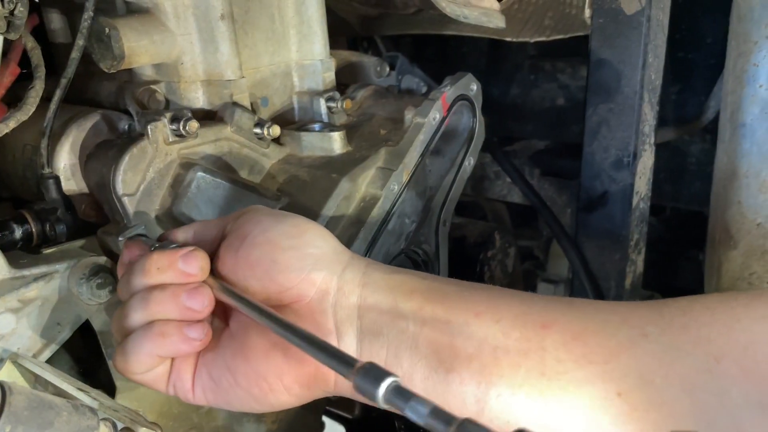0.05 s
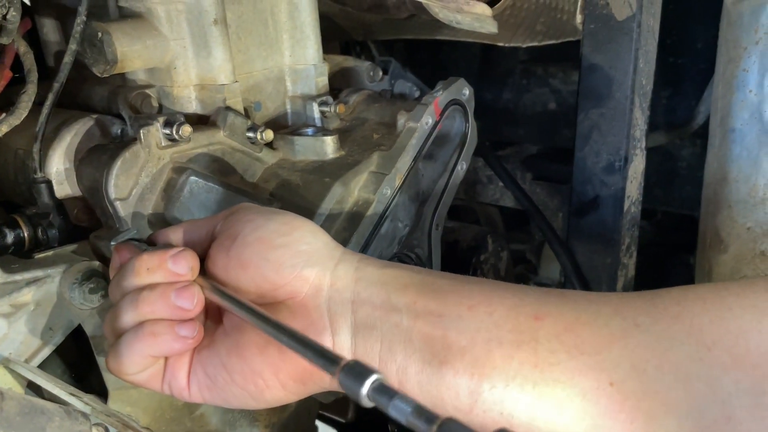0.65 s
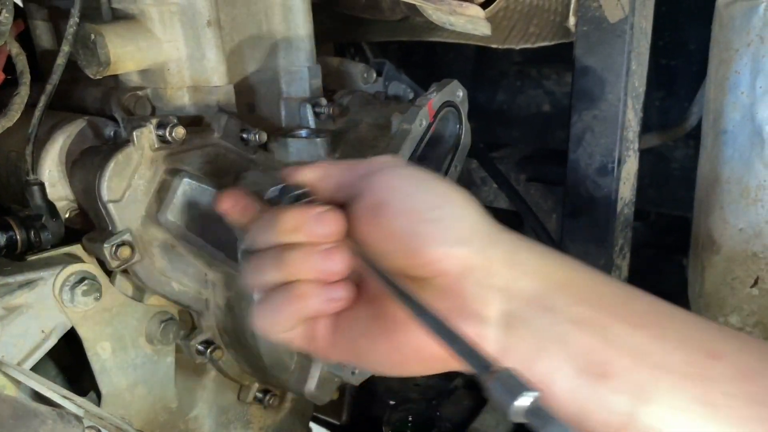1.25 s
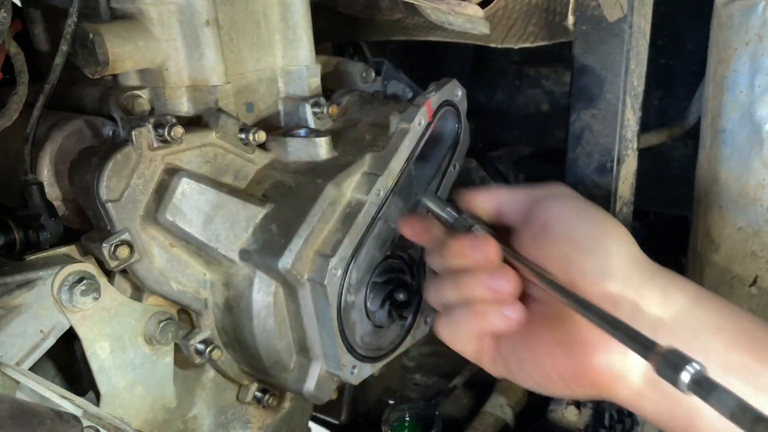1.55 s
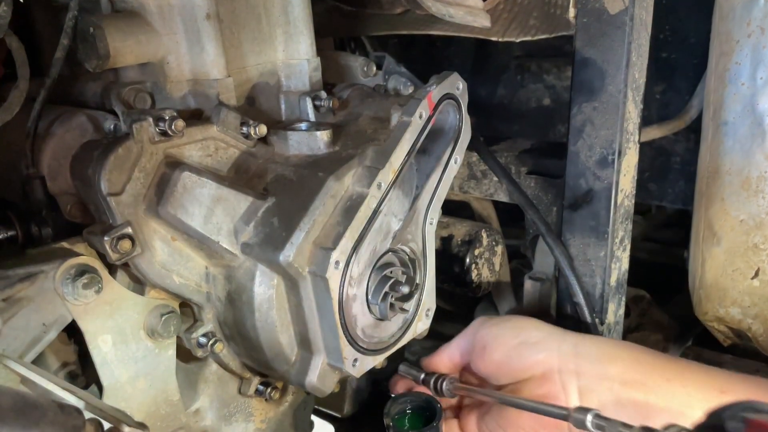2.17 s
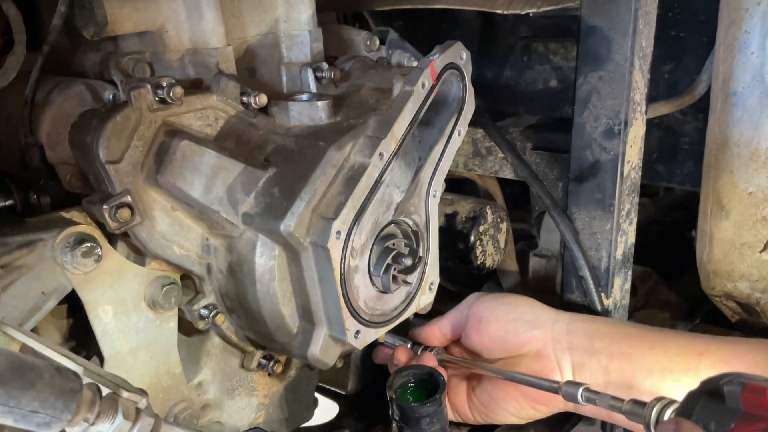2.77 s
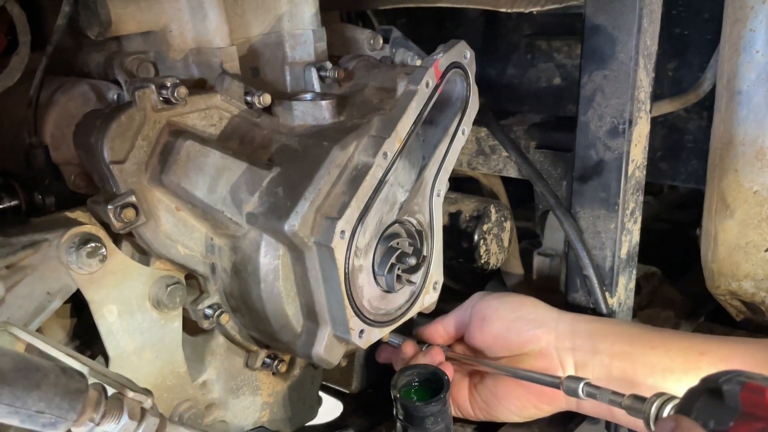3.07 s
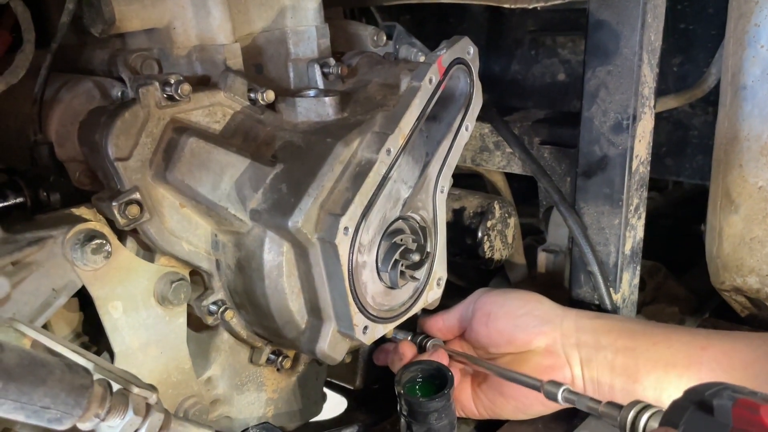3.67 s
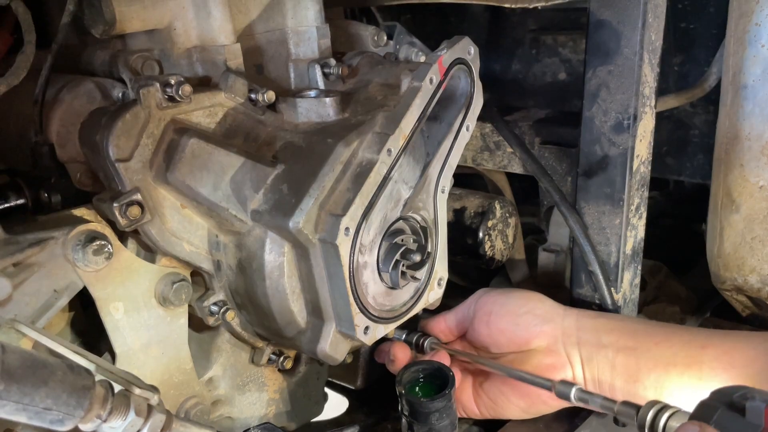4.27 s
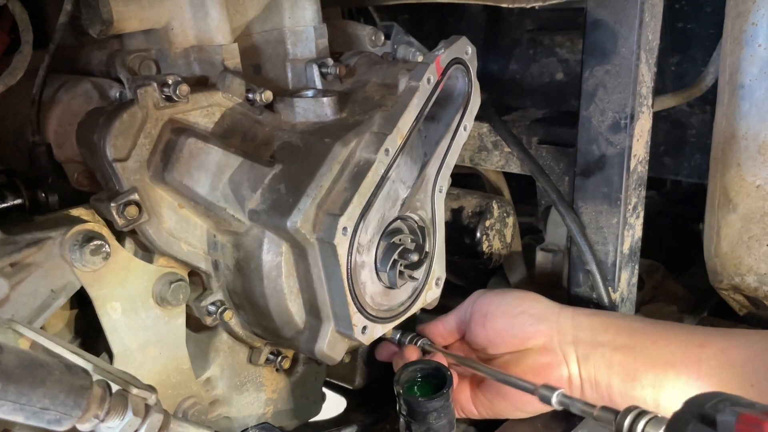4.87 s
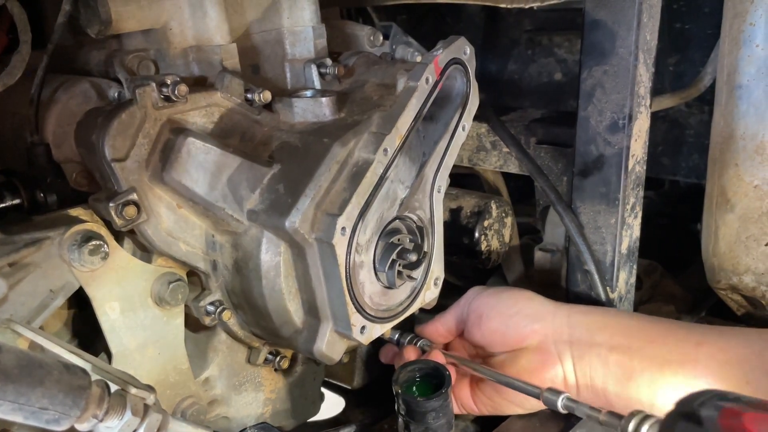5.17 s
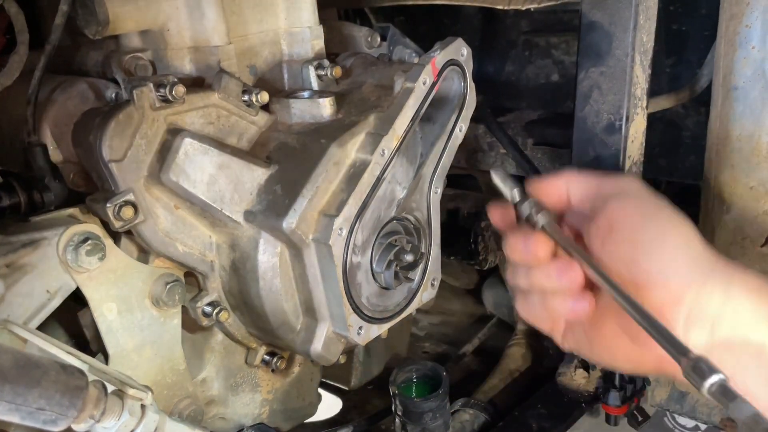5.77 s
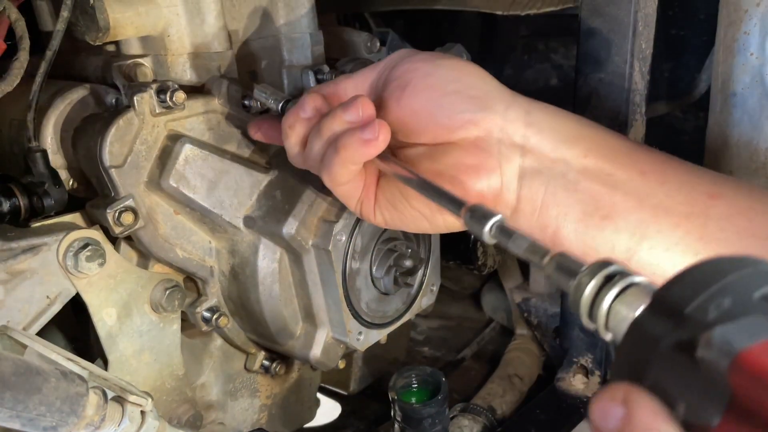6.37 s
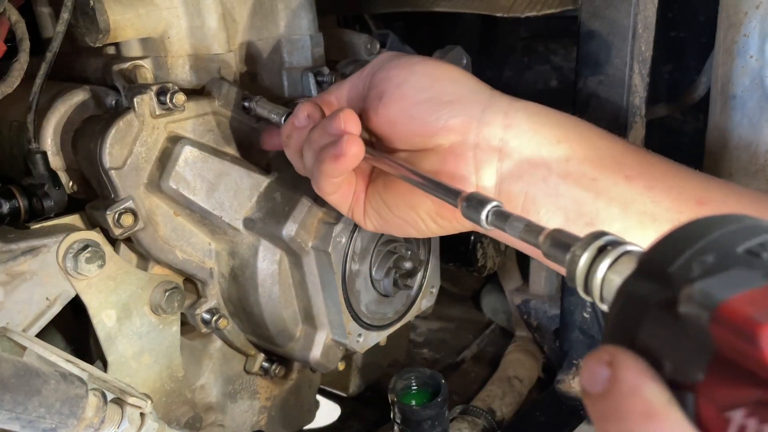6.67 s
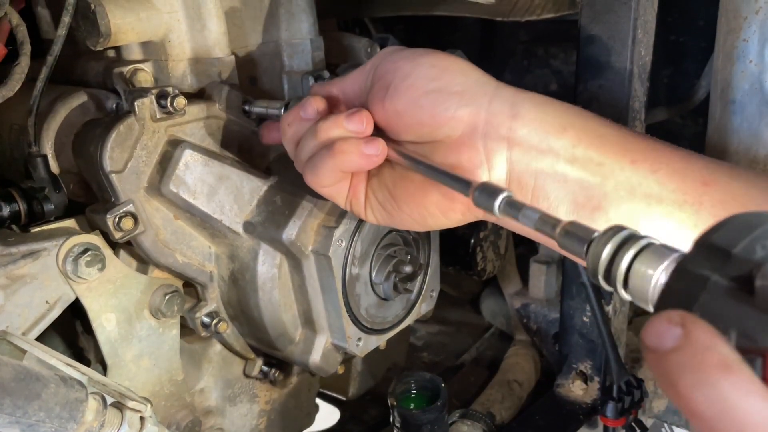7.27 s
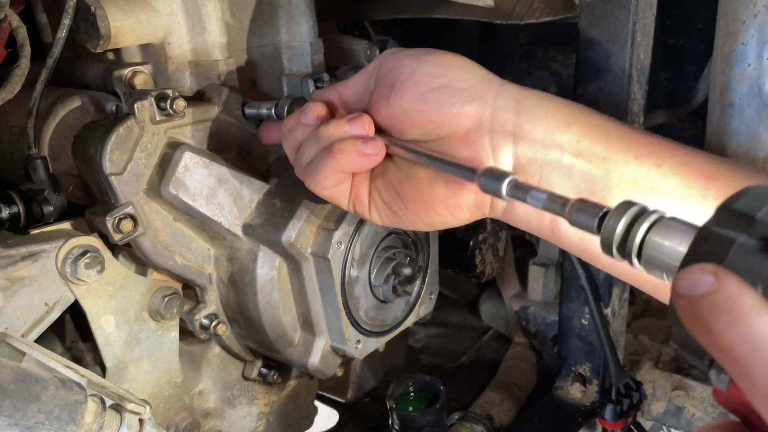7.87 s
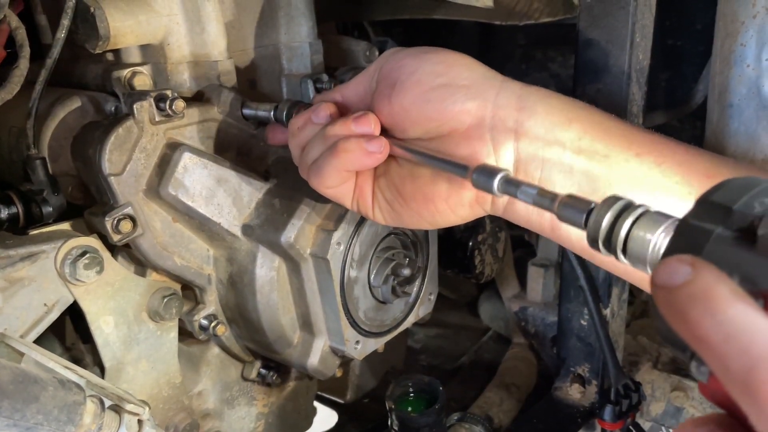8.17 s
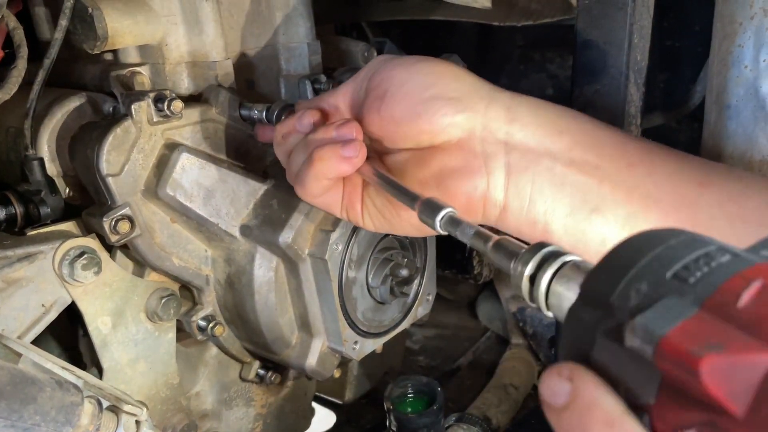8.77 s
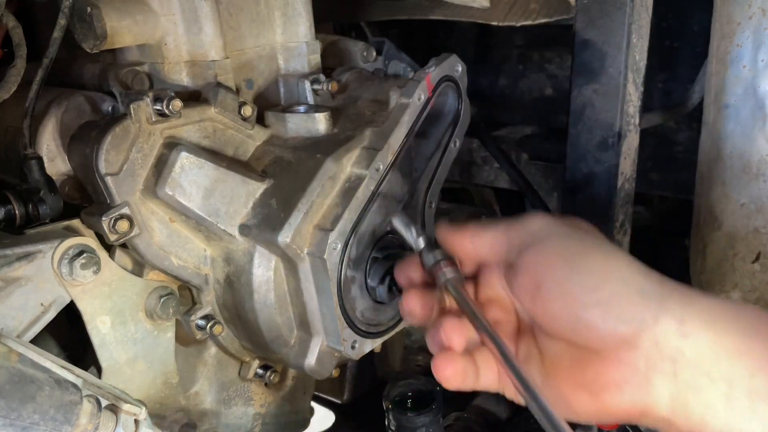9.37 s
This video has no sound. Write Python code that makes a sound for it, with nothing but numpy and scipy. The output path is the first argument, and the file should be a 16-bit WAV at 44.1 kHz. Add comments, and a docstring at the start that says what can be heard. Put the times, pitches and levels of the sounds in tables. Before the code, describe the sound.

A cordless drill is heard very close, tightening bolts on a metal engine cover over faint workshop air and a low machine hum. It starts at once on a nearly tight bolt: the gears grind and the clutch slips in two bursts of hard snaps, finishing by 0.9 seconds. A quiet pause holds soft hand rubbing and small socket ticks. At 3.3 seconds the socket clinks onto the second bolt and the motor whines with rattling gears, until the bolt binds and the clutch clicks loudly from 4.7 to 5 seconds. The socket ticks as it comes off around 5.4 seconds. After another lull, clinks lead into a third run at 7.2 seconds, the whine rising slightly, then ending in sharp snaps and dull thuds from 8.4 to 8.7 seconds. A brief low rumble and two light clinks follow by about 9.3 seconds.

```python
"""A cordless drill runs three bolts into an aluminium engine cover, close up, over workshop air and hum.
It starts on a nearly tight bolt: the gears grind and the torque clutch slips in hard snaps, twice over.
The socket clinks onto the second bolt; from 3.3 s the motor whines and the gears rattle freely,
until the bolt binds and the clutch snaps again. The socket ticks as it is wiggled off.
The third bolt runs in from 7.2 s and seats with snaps and thuds; a low rumble and two clinks follow."""
import sys
import numpy as np
from scipy import signal
from scipy.fft import rfft, irfft, next_fast_len
from scipy.io import wavfile

SR = 44100
rng = np.random.default_rng(int(sys.argv[2]) if len(sys.argv) > 2 else 0)


def wav_record(signal):
    """Record a signal, one row per channel, as 16-bit PCM in the file named by sys.argv[1]."""
    frames = np.transpose(np.atleast_2d(signal))
    bounded = np.clip(frames, -1, 1)
    # unit amplitude maps onto the largest positive 16-bit level
    quanta = np.round(bounded * 32767).astype(np.int16)
    wavfile.write(sys.argv[1], SR, quanta)


N = 424683
TIME = np.arange(N) / SR


def undb(db):
    """Decibels to gain."""
    return np.exp(np.log(10) / 20 * np.asarray(db))

def unit(x):
    """Scale to rms 1."""
    return x / np.sqrt(np.mean(x ** 2))

def sine(cycles):
    """Sine of a phase counted in cycles."""
    return np.sin(2 * np.pi * cycles)

def noise(size=N):
    """White noise."""
    return rng.standard_normal(size)

def curve(rows):
    """One automation curve for each column after the time."""
    s, *columns = np.transpose(rows)
    return [np.interp(TIME, s, c) for c in columns]

def walk(rate):
    """Random modulation: rate points a second, joined by straight lines; rms 1."""
    count = int(N * rate / SR) + 2
    return unit(np.interp(TIME * rate, np.arange(count), noise(count)))

def swell(s, half_s, db):
    """A smooth fade in and out around a moment."""
    return undb(db) * np.exp(-((TIME - s) / half_s) ** 2)

def add(track, s, sound):
    """Mix a short sound in at a time."""
    i = max(int(s * SR), 0)
    track[i:i + len(sound)] += sound[:N - i]

def response(points, size):
    """Spread (frequency, value) points over the bins of an FFT."""
    hz, value = np.transpose(points)
    return np.interp(np.log(np.arange(size // 2 + 1) * SR / size + 1), np.log(hz), value)

def ring(x, impulse):
    """Play a sound through an impulse response."""
    return signal.oaconvolve(x, impulse)[:len(x)]

def colour(x, points, size=4096):
    """Minimum-phase EQ that keeps the power of white noise."""
    cepstrum = irfft(np.log(undb(response(points, size))))
    cepstrum[1:size // 2] *= 2
    cepstrum[size // 2 + 1:] = 0
    impulse = irfft(np.exp(rfft(cepstrum)))
    return ring(x, impulse / np.linalg.norm(impulse))

def modes(rows):
    """Impulse response of a set of decaying resonances; energy 1."""
    t = TIME[:SR]
    impulse = sum(undb(db - 60 * t / t60) * sine(hz * t) for hz, db, t60 in rows)
    return impulse / np.linalg.norm(impulse)

def tail(t60):
    """Dense decaying reflections; energy 1."""
    impulse = noise(SR) * undb(-60 * TIME[:SR] / t60)
    return impulse / np.linalg.norm(impulse)

def burst(contact_ms, buzz_db, buzz_t60, rise_ms=0.58, size=4096):
    """Steel chatters on steel for a few ms and the parts around it buzz on; energy 1."""
    ms = 1000 * TIME[:size]
    contact = np.exp(-(ms / contact_ms) ** 2)
    buzz = undb(buzz_db - 60 * TIME[:size] / buzz_t60)
    force = noise(size) * (1 - np.exp(-ms / rise_ms)) * (contact + buzz)
    return force / np.linalg.norm(force)


# Stereo image at the two microphone ports:
# (frequency [Hz], left minus right [dB], left phase lead [rad], weight of reflections [ratio])
STEREO_IMAGE = [(100, 0, 0, 0.063), (696, -2, 0.91, .25), (1460, -1.5, -1.5, 0.44), (2380, 1.5, 0.2, 0.37),
                (2900, 5.5, 1.2, 0.39), (4300, 1.5, 0.33, .35), (5640, 3, 1.5, 0.41),
                (6380, .5, 0.04, 0.38), (8760, -0.5, -4, 0.028), (9550, 0.5, -4.5, .2),
                (11300, -1, -7, .05), (13400, 0.5, -7.5, .2), (14800, 1.5, -9.5, .05)]

def place(x, pan_db, scatter, scatter_t60=0.17):
    """Each port hears the direct sound with its own phase, plus its own reflections; +pan is left."""
    size = 2 * next_fast_len((N + SR) // 2, True)
    ports = np.array(STEREO_IMAGE)
    balance_db, lead, weight = (response(ports[:, [0, k]], size) for k in (1, 2, 3))
    wet = np.clip(scatter * weight, 0, 1)
    spectrum, out = rfft(x, size), []
    for side in (1, -1):
        direct = np.sqrt(1 - wet) * np.exp(.5j * side * lead)
        reflected = np.sqrt(wet) * rfft(tail(scatter_t60), size)
        gain = undb(side * (balance_db + pan_db) / 2)
        out.append(irfft(spectrum * (direct + reflected) * gain, size)[:N])
    return np.array(out)


# Room tone EQ: (frequency [Hz], level [dB])
AIR_EQ = [(20, -41), (40, -19.5), (62, -9), (100, -12.5), (140, -12), (200, -18.5), (400, -19.5),
          (800, -23), (1500, -27), (4000, -36), (8000, -50.5), (12000, -55), (15000, -60.5)]
# Room tone fader: (time [s], level [dB])
AIR_FADER = [(0, -43.5), (.5, -57), (1.2, -62), (1.6, -59), (5, -56.5), (9.6, -57)]
# Hum of a distant machine: (frequency [Hz], level over the air [dB])
HUM_TONES = [(131.8, 2.5), (128, -11), (173, -14)]

def room_tone():
    """The bed: dark workshop air, and a machine hum that wavers in level and pitch."""
    air_db, = curve(AIR_FADER)
    air = colour(noise(), AIR_EQ) * undb(air_db + 0.32 * walk(8))
    hum = 0
    for hz, db in HUM_TONES:
        gain = np.sqrt(2) * undb(air_db + db + walk(10))
        hum += gain * sine(np.cumsum(hz * (1 + 0.0043 * walk(9))) / SR)
    return air, hum


# The hand slides along the extension bar: (centre time [s], half length [s], level [dB])
HAND_SLIDES = [(1.56, 0.19, -64), (5.402, 0.11, -61.5), (5.627, 0.054, -64.5), (6.018, 0.091, -65),
               (8.966, 0.18, -59.5), (9.28, 0.057, -70)]

def handling(grip_db=-80.5):
    """The hand rubs softly; the gripped drill and the cover rumble after the last bolt seats."""
    rub_eq = [(300, -4), (1500, 8), (4500, 2.5), (8000, -9), (12000, -6.5), (15000, -14.5)]
    rumble_eq = [(22, -17.5), (44, -2), (80, -16), (400, -25.5), (2000, -70.5)]
    sliding = undb(grip_db) + sum(swell(*slide) for slide in HAND_SLIDES)
    rub = colour(noise() * undb(3.2 * walk(280)), rub_eq) * sliding
    rumble = colour(noise(), rumble_eq) * swell(s=8.84, half_s=0.16, db=-49)
    return rub, rumble


# Lingering tones of the casting: (time [s], frequency [Hz], level [dB], t60 [s])
CASTING_TONES = [(0.633, 764, -64.5, 4), (0.633, 1723, -76.5, 3.5), (4.96, 830, -56.5, 1.1),
                 (8.703, 1980, -58.5, .8)]

def casting_ring():
    """The casting sings on faintly once a bolt is tight."""
    out, t = np.zeros(N), TIME[:3 * SR]
    for s, hz, db, t60 in CASTING_TONES:
        add(out, s, undb(db - 60 * t / t60) * sine(hz * t))
    return out


# Jolts through the engine mounts: (time [s], relative level [dB])
JOLTS = [(0.165, -28), (0.245, -27), (4.795, -35.5), (7.685, -35.5), (8.472, -21.5), (8.535, -21),
         (8.702, -19)]

def thumps(sweep_hz=330, end_hz=48, fall_s=0.0054, attack_s=0.0065, trim_db=-2.5):
    """Each jolt is heard as a short low thud that glides downward."""
    out, t = np.zeros(N), TIME[:SR // 4]
    phase = np.cumsum(end_hz + sweep_hz * np.exp(-t / fall_s)) / SR
    envelope = t / attack_s * np.exp(1 - t / attack_s)
    for s, db in JOLTS:
        add(out, s, undb(db + trim_db) * envelope * sine(phase))
    return out


# Clinks of socket, bolt and trigger: (time [s], relative level [dB], body over the clink [dB])
CLINK_HITS = [(0.5494, -34.5, 2), (0.581, -35, 13), (1.497, -44, -7), (2.554, -41.5, -9), (3.057, -53, 7.5),
              (3.102, -41, 4.5), (3.273, -44, -15.5), (3.331, -39, 0), (3.3445, -16, -7.5),
              (5.387, -18.5, -27), (5.8, -48, -7), (7.182, -45, 4), (7.243, -28.5, -30), (7.268, -26, -7),
              (8.966, -32, 1.5), (9.3221, -29.5, -6.5)]
# The socket is wiggled off a bolt: (centre time [s], half length [s], relative level [dB])
SOCKET_WIGGLES = [(5.353, 0.03, -47.5), (5.44, 0.046, -50), (9.027, 0.056, -46.5)]
# EQs of a bright clink and of the dull body of a hit on the gearbox: (frequency [Hz], level [dB])
CLINK_EQ = [(300, -24), (1000, -10), (2000, -4.5), (3300, 1.5), (6500, 0.5), (9000, -5), (13000, -7.5),
            (15500, -12.5)]
BODY_EQ = [(30, -27.5), (90, -8.5), (200, -8.5), (350, -12.5), (750, -4), (1050, -7.5), (1450, 0.5),
           (1750, -2), (2300, -6.5), (3500, -9), (6500, -21), (12000, -27.5), (15000, -26.5)]
# Ring of the loose socket: (frequency [Hz], level [dB], t60 [s])
SOCKET_MODES = [(2280, -11, 0.16), (2957, -6, 0.13), (3400, -1.5, 0.056), (4093, -1, .09),
                (5240, -4.5, 0.057), (6300, -7, .1)]
DULL_BUZZ = dict(buzz_db=-12, buzz_t60=0.09)

def socket_clinks(contact_ms=1.8, gain_db=10.5, ring_db=-10, ticks_per_wiggle=9):
    """Light metal taps and loose ticks; returns the hits and the socket's ring."""
    bright, body = np.zeros((2, N))
    for s, db, body_db in CLINK_HITS:
        add(bright, s, undb(db + gain_db) * burst(contact_ms, buzz_db=-10, buzz_t60=0.043))
        add(body, s, undb(db + gain_db + body_db) * burst(contact_ms, **DULL_BUZZ))
    for s, half_s, db in SOCKET_WIGGLES:
        for moment, strength in rng.uniform(-1, 1, (ticks_per_wiggle, 2)):
            tick = undb(db + gain_db + 9 * strength) * burst(contact_ms, **DULL_BUZZ)
            add(bright, s + half_s * moment, tick)
    hits = colour(bright, CLINK_EQ) + colour(body, BODY_EQ)
    return hits, undb(ring_db) * ring(bright, modes(SOCKET_MODES))


# Resonances of the drill's housing: (frequency [Hz], width [Hz], boost [dB], change under load [dB])
HOUSING_PEAKS = [(640, 40, 5, -4), (1310, 70, 6, -6), (1680, 220, 1.5, 3), (3080, 340, 4.5, 3),
                 (4650, 220, 4, 3)]

def housing_boost(hz, pressed, hop=64):
    """Boost in dB of a tone as it glides through the housing's resonances."""
    boost_db = sum((db + load_db * pressed[::hop]) * np.exp(-((hz[::hop] - centre) / width) ** 2)
                   for centre, width, db, load_db in HOUSING_PEAKS)
    return np.repeat(boost_db, hop)[:N]


# Magnetic and fan tones: (multiple of the turn rate, level [dB], change under load [dB])
MOTOR_PARTIALS = [(4, -22, -0.5), (6, -14.5, 0), (10, -10.5, 1.5), (12, -15.5, 5.5), (14, -0.5, -7),
                  (16, -4.5, -1.5), (18, -21, 11), (20, -17.5, 8), (22, -12, 9), (24, -22, 13),
                  (26, -16, 12), (30, -23.5, 15.5)]
# Fader on the whine's main tone: (time [s], level [dB])
MAIN_TONE_FADER = [(0.02, 1.5), (0.04, -6.5), (3.38, 2), (3.54, 3), (3.63, 0), (4.22, 1), (4.38, -5.5),
                   (4.52, -6.5), (4.6, 0), (4.64, -5.5), (7.29, 5), (7.33, -7), (7.45, 1), (7.6, -1.5),
                   (7.76, 1.5), (7.84, -11), (7.91, -7), (7.955, -15), (8.0, -3), (8.15, 0), (8.3, -2.5),
                   (8.36, -0.5)]
# Sidebands of the speed controller's chopping rate: (offset [turn rates], level [dB])
CHOPPER_SIDEBANDS = [(-4, -16.5), (-2, -10), (2, -13.5), (4, -25)]

def motor_whine(hz, turns, pressed, main_multiple=14, chopper_hz=8000, rough_db=1.7):
    """Harmonics ride the shaft speed, while the windings sing around the chopping rate."""
    main_db, = curve(MAIN_TONE_FADER)
    whine = 0
    for multiple, db, load_db in MOTOR_PARTIALS:
        boost_db = housing_boost(multiple * hz, pressed) + load_db * pressed
        if multiple == main_multiple:
            boost_db += main_db
        whine += undb(db + boost_db + rough_db * walk(70)) * sine(multiple * turns)
    for offset, db in CHOPPER_SIDEBANDS:
        whine += undb(db + 2 * walk(32)) * sine(chopper_hz * TIME + offset * turns)
    return whine


# Tones of the meshing gears: (multiple of the tooth rate, level [dB])
MESH_PARTIALS = [(1, -11.5), (2, -7), (3, -8), (4, -9), (5, -10.5), (6, -9), (7, -6.5), (8, -9.5), (9, -16)]
# EQs of the gear rattle and of the grind under load: (frequency [Hz], level [dB])
RATTLE_EQ = [(150, -19), (480, -20.5), (750, -6.5), (1100, -11), (1450, -3.5), (2300, -7), (3000, -2.5),
             (3700, -3), (4700, -2), (6800, -9.5), (7800, -17), (9500, -14), (13300, -17.5), (15000, -29)]
GRIND_EQ = [(30, -32.5), (100, -13), (400, -15.5), (750, -6.5), (1050, -6.5), (1500, -3), (2100, -5.5),
            (3000, -11.5), (6000, -33)]
# Resonances of the gear case: (frequency [Hz], level [dB], t60 [s])
GEAR_CASE_MODES = [(697, -11, 0.057), (860, -9.5, 0.094), (1370, -2, 0.029), (1523, 3.5, 0.049),
                   (1744, 3, 0.069), (2010, -2, 0.031), (4200, -3, 0.017)]

def gearbox(hz, turns, thread, pressed, rattle_gain, grind_gain, teeth_per_turn=22 / 7):
    """Loosely meshing teeth sing, rattle and growl, and grind under load."""
    # the off-centre planet carrier cyclically hurries the teeth and presses them harder
    wobble, planet = sine(turns / 9.7), sine(turns / 5.9)
    # backlash lets the teeth run ahead of and behind the shaft, less so under load
    backlash = 0.016 * (1 - 0.4 * pressed) * walk(400)
    teeth = teeth_per_turn * (turns + np.cumsum(hz * (backlash + 0.014 * wobble)) / SR)
    # the mesh brightens while the teeth are pressed together
    bite_db = 0.5977 * (wobble + 0.55 * planet + 0.65 * walk(110))
    mesh = 0
    for multiple, db in MESH_PARTIALS:
        boost_db = housing_boost(multiple * teeth_per_turn * hz, pressed) + multiple * bite_db
        mesh += undb(db + boost_db + 1.5 * walk(260)) * sine(multiple * teeth)
    pressure = undb(1.23 * wobble + 0.6 * planet + 0.48 * thread + 0.28 * walk(90))
    mesh *= pressure * (rattle_gain * undb(-7) + grind_gain * undb(-9))
    scrape = (1 + 0.52 * np.cos(2 * np.pi * teeth)) * pressure
    rattle = colour(noise() * scrape, RATTLE_EQ) * rattle_gain * undb(-3)
    grind = colour(noise() * scrape * undb(2.4 * walk(300)), GRIND_EQ) * grind_gain * undb(-2.5)
    # each tooth strikes its front or back flank, unevenly, and makes the case growl
    tooth_clicks = np.diff(np.floor(teeth), prepend=0)
    strikes = tooth_clicks * np.sign(noise()) * undb(3.7 * noise()) * pressure
    growl = unit(ring(strikes, modes(GEAR_CASE_MODES)))
    growl *= rattle_gain * undb(-11.5) + grind_gain * undb(-8)
    return rattle + grind + growl + mesh


# Motor speed from trigger pull to release, one list a run: (time [s], turn rate [Hz])
RUN_SPEEDS = [
    [(0.0, 217), (0.03, 212.1), (0.07, 195.9), (0.1, 178.3), (0.135, 151.1), (0.162, 133.2), (0.22, 149.9),
     (0.39, 172.3)],
    [(0.605, 193.8), (0.68, 195.2), (0.8, 176.3)],
    [(3.345, 203.2), (3.55, 204.3), (4.2, 208.5), (4.26, 212.8), (4.55, 216.7), (4.605, 208.5),
     (4.671, 182.3), (4.8, 191.2), (4.99, 182.7)],
    [(7.246, 178), (7.31, 211.3), (7.552, 214.7), (7.764, 222.6), (7.88, 227.3), (8.146, 230.8),
     (8.338, 227.5), (8.37, 209), (8.42, 199.4), (8.735, 175.5)],
]
# Load on each run: (bolt binds [s], clutch lets go [s], free rattle [dB], full-load grind [dB],
# whine over rattle [dB])
RUN_LOADS = [(0.047, 0.179, -26, -24.5, 0.5), (0.604, 0.639, -31, -32.5, 2.5),
             (4.601, 4.66, -38.5, -31, -5.5), (8.314, 8.416, -35.5, -29.5, -3.5)]
FREE_GRIND_DB = -13.5  # grind relative to rattle while spinning free

def run_envelopes(edge_s=0.0067, unload_s=0.029, spin_up_s=0.021):
    """Gains of rattle, grind and whine: a run spins free, loads up, and eases as the clutch slips."""
    gains = 0
    slipping_db = np.array([[-40], [-38], [-51]])  # rattle, grind, whine
    for speed, (bind_s, slip_s, free_db, loaded_db, whine_over_db) in zip(RUN_SPEEDS, RUN_LOADS):
        pull_s, release_s = speed[0][0], speed[-1][0]
        trigger = np.clip(np.minimum(TIME - pull_s, release_s - TIME) / edge_s + 1, 0, 1)
        load = np.sin(np.pi / 2 * np.clip((TIME - bind_s) / (slip_s - bind_s), 0, 1))
        eased = np.clip((TIME - slip_s) / unload_s, 0, 1)
        rattle_db = free_db + 4 * load
        grind_db = (1 - load) * (free_db + FREE_GRIND_DB) + load * loaded_db
        spin_up_db = -12 * np.exp(-np.abs(TIME - pull_s) / spin_up_s)
        whine_db = rattle_db + whine_over_db + spin_up_db - 4.5 * load ** 2  # sinks into the grind
        driving_db = np.array([rattle_db, grind_db, whine_db])
        gains += trigger * undb((1 - eased) * driving_db + eased * slipping_db)
    return gains

def drill(turns_per_bolt_turn=19.4, swell_db=0.6):
    """One shaft drives whine and gears; the thread drags on it and it judders under strain."""
    hz, = curve([row for run in RUN_SPEEDS for row in run])
    rattle_gain, grind_gain, whine_gain = run_envelopes()
    strain = np.minimum(grind_gain / (rattle_gain + 1e-9), 2)
    pressed = np.clip(strain - undb(FREE_GRIND_DB), 0, 1)
    thread = sine(np.cumsum(hz) / SR / turns_per_bolt_turn)
    drag = 0.008 * thread + 0.002 * walk(18)
    judder = 0.002 * walk(60) + 0.005 * strain * walk(300)
    turns = np.cumsum(hz * (1 + drag + judder)) / SR
    whine = motor_whine(hz, turns, pressed)
    gears = gearbox(hz, turns, thread, pressed, rattle_gain, grind_gain)
    return whine_gain * undb(swell_db * walk(8)) * whine, gears


# The clutch ratchets as the second run coasts to a stop: (time [s], relative level [dB])
RATCHET_CLICKS = [(0.8067, -5), (0.8216, -10.5), (0.836, -9), (0.8496, -10.5), (0.863, -12.5), (0.878, -14),
                  (0.896, -23)]
# EQ of the clutch's clicks and snaps: (frequency [Hz], level [dB])
SNAP_EQ = [(150, -26.5), (430, -16.5), (700, -10), (1100, -10.5), (1500, -2), (2100, -2), (2700, -2),
           (3400, 0), (4500, 0.5), (5500, 0), (7000, -1), (8300, -2), (10000, -4.5), (13000, -6.5),
           (15500, -10)]
CLUTCH_GAIN_DB = 16

def clutch_ratchet(contact_ms=2.1, ring_db=-10, held_decay=0.081):
    """The unloaded clutch makes short contacts; returns the clicks and the socket's choked ring."""
    clicks = np.zeros(N)
    for s, db in RATCHET_CLICKS:
        click = burst(contact_ms, buzz_db=-15, buzz_t60=0.066, rise_ms=0.35)
        add(clicks, s, undb(db + CLUTCH_GAIN_DB) * click)
    # pressed on a tight bolt, the socket rings for only a share of its time
    held_socket = modes([(hz, db, t60 * held_decay) for hz, db, t60 in SOCKET_MODES])
    return colour(clicks, SNAP_EQ), undb(ring_db) * ring(clicks, held_socket)


# The clutch jumps one ramp:
# (time [s], relative snap level [dB], body over the snap [dB], relative knock level [dB])
CLUTCH_SLIPS = [(0.165, -10.5, 5.5, -16), (0.1922, -6.5, -5.5, -10.5), (0.25, -6, -4.5, -6),
                (0.3049, -5.5, -10.5, -9), (0.3609, -6, -6.5, -19.5), (0.633, -4, -3.5, -2),
                (0.6886, -4, -3.5, -12.5), (0.7454, -4, -7, -19), (4.6749, -3, -7, -11.5),
                (4.735, -4.5, -10, -9), (4.791, -2.5, -11.5, -18), (4.8463, -6, -10.5, -23),
                (4.9025, -7.5, -4, -20), (4.9597, -5, -9.5, -18.5), (8.4143, -4.5, -6, -8.5),
                (8.4734, -4, -6, -12), (8.532, -5.5, -1.5, -18), (8.5878, -6, -3.5, -23),
                (8.6452, -6, -11.5, -14), (8.7018, -6, -6.5, -19.5)]

def clutch_snaps(snap_ms=6.3, rebound_ms=1.8, body_ms=6.1, rebound_s=0.0102):
    """Each slip is a hard snap and one softer rebound, both with a dull push into the gearbox."""
    crack, body = np.zeros((2, N))
    contacts = []
    for s, db, body_db, _ in CLUTCH_SLIPS:
        contacts += [(s, db, body_db, snap_ms), (s + rebound_s, db - 4.5, -8, rebound_ms)]
    for s, db, body_db, contact_ms in contacts:
        gain = undb(db + CLUTCH_GAIN_DB)
        add(crack, s, gain * burst(contact_ms, buzz_db=-16, buzz_t60=0.078))
        add(body, s, gain * undb(body_db) * burst(body_ms, rise_ms=3.9, **DULL_BUZZ))
    return colour(crack, SNAP_EQ) + colour(body, BODY_EQ)


# A bolt head beds in, or the gears knock under load: (time [s], relative level [dB])
KNOCK_HITS = [(0.183, -13.5), (0.226, -17.5), (0.281, -15.5), (0.334, -23.5), (0.391, -22), (0.662, -15),
              (0.719, -15.5), (0.775, -11.5), (0.799, -19.5), (4.629, -20.5), (4.648, -18.5),
              (4.708, -12.5), (4.819, -21), (4.876, -19), (4.931, -16.5), (8.347, -18.5), (8.387, -11.5),
              (8.448, -11.5), (8.506, -20), (8.618, -20.5), (8.675, -14.5)]
# EQ of a knock: (frequency [Hz], level [dB])
KNOCK_EQ = [(60, -22), (200, -16), (400, -12.5), (750, -5.5), (1050, -5), (1500, 1), (1900, -2), (2500, -9),
            (3500, -11), (6500, -20), (15000, -30)]

def knocks(contact_ms=1.2, gain_db=15, slack_s=0.009):
    """Bolt heads and gears knock under load, and the gears take up their slack just before each snap."""
    out = np.zeros(N)
    slack_hits = [(s - slack_s, db) for s, _, _, db in CLUTCH_SLIPS]
    for s, db in list(KNOCK_HITS) + slack_hits:
        add(out, s, undb(db + gain_db) * burst(contact_ms, buzz_db=-17.5, buzz_t60=0.057))
    return colour(out, KNOCK_EQ)


# Ring of the steel extension bar: (frequency [Hz], level [dB], t60 [s])
BAR_MODES = [(3280, 0.5, 0.052), (3620, -4, 0.073), (4430, -1.5, .07), (4770, 0, 0.047),
             (5520, -6.5, 0.077), (6750, -4, 0.07), (7360, -6, 0.12), (10000, -7, 0.07)]

def metal_hits(bar_db=-20):
    """Ratchet, snaps, knocks and clinks all ring the bar; the socket's ring is layered on top."""
    ratchet, held_ring = clutch_ratchet()
    blows = clutch_snaps() + knocks()
    clinks, loose_ring = socket_clinks()
    force = ratchet + blows + clinks
    return force + undb(bar_db) * ring(force, modes(BAR_MODES)) + held_ring + loose_ring


# Position at each bolt: (start [s], end [s], whine pan [dB], gear pan [dB], hit pan [dB])
BOLT_POSITIONS = [(0, 1.7, 2.5, 0.1, 0), (1.7, 6.2, 3.2, 0.3, 0), (6.2, 9.7, 2.5, -0.3, -0.3)]
# Clank of the cover, one list a bolt: (frequency [Hz], level [dB], t60 [s])
COVER_MODES = [
    [(840, -5, .022), (950, -5, 0.032), (1434, -0.5, .02), (1630, -3.5, .022), (1730, 0, .018)],
    [(670, -5, .025), (1405, -3, .028), (1730, -10.5, .022), (2230, 1, .025), (4370, -1, 0.022)],
    [(925, -1, .02), (1534, 5, 0.035), (1720, -3, .018), (2155, -10, 0.028), (7670, -0.5, 0.019)],
]

def scene(room_t60=0.5, room_db=-30, cover_db=-20.5):
    """The mix: room bed, a faint reverb, and the close drill with its own clank and pan at each bolt."""
    whine, gears = drill()
    hits = metal_hits()
    air, hum = room_tone()
    rub, rumble = handling()
    out = place(air + rub, pan_db=0, scatter=1.9, scatter_t60=4)
    out += place(hum + rumble, pan_db=-3.5, scatter=0)
    out += undb(room_db) * np.array([ring(whine + gears + hits, tail(room_t60)) for _ in range(2)])
    out += place(thumps() + casting_ring(), pan_db=1, scatter=0.55, scatter_t60=0.034)
    for (start_s, end_s, whine_pan, gear_pan, hit_pan), cover in zip(BOLT_POSITIONS, COVER_MODES):
        here = (TIME >= start_s) & (TIME < end_s)
        clank = hits * here + undb(cover_db) * ring(hits * here, modes(cover))
        out += place(whine * here, whine_pan, scatter=0)
        out += place(gears * here, gear_pan, scatter=0.9, scatter_t60=0.11)
        out += place(clank, hit_pan, scatter=0.71, scatter_t60=0.045)
    return out

def record(dry):
    """Soft clipping rounds the highest peaks and a steep low-pass cuts the top."""
    low_pass = signal.ellip(8, .2, 85, 15600, fs=SR, output="sos")
    return signal.sosfilt(low_pass, np.tanh(dry))


dry = scene()
out = record(dry)
wav_record(out)
```